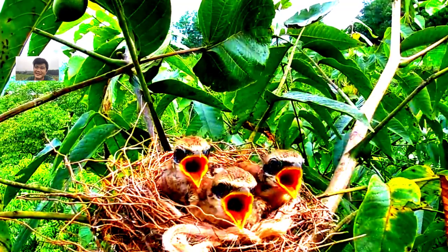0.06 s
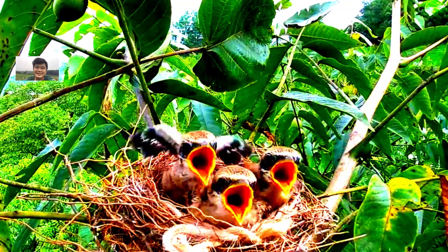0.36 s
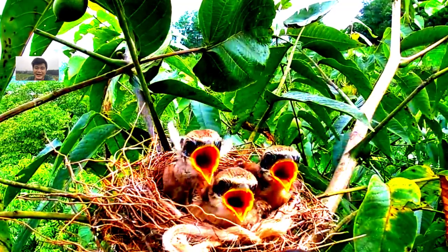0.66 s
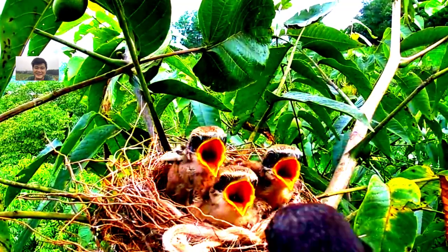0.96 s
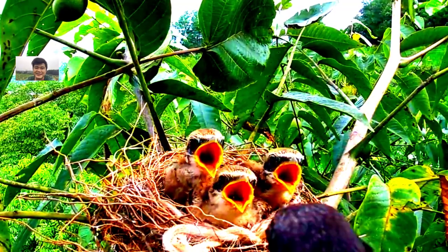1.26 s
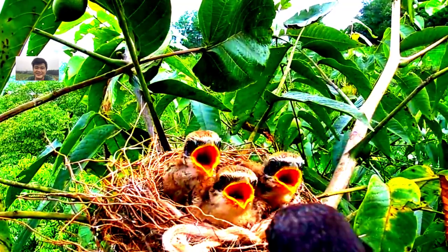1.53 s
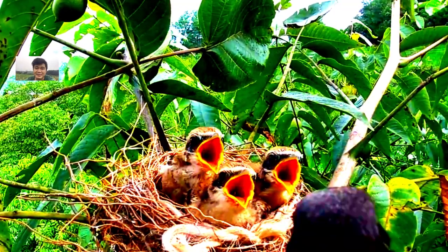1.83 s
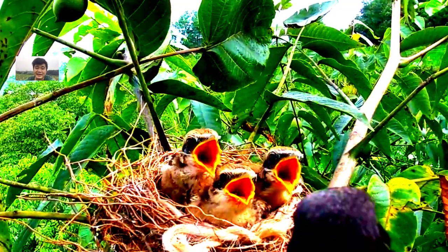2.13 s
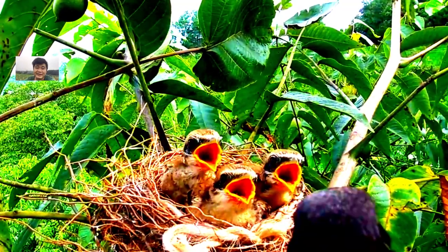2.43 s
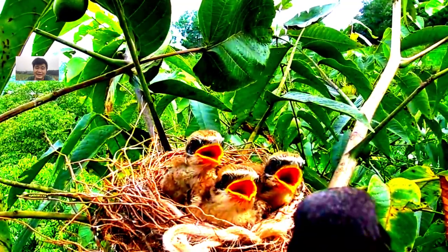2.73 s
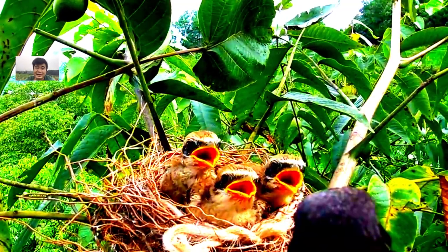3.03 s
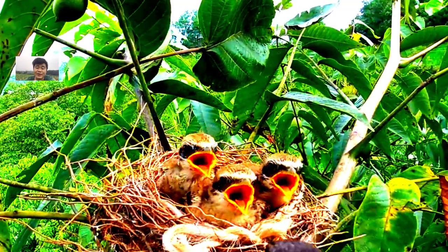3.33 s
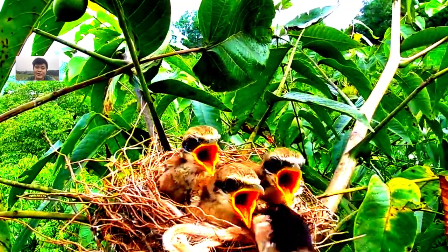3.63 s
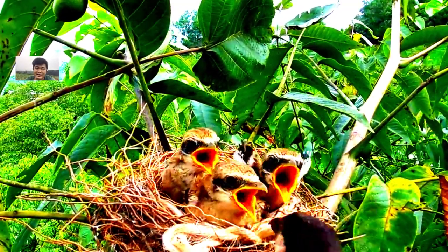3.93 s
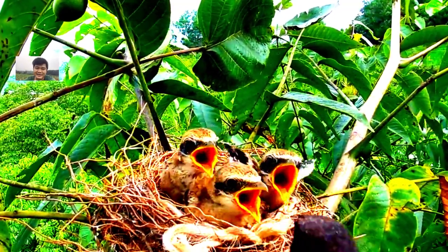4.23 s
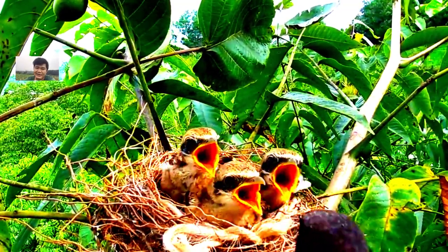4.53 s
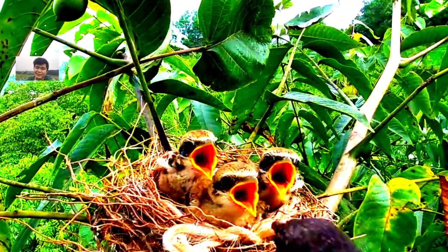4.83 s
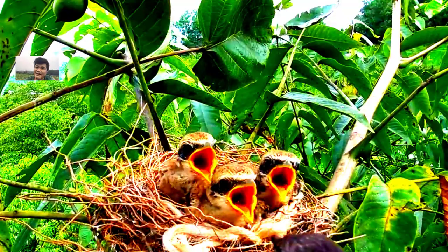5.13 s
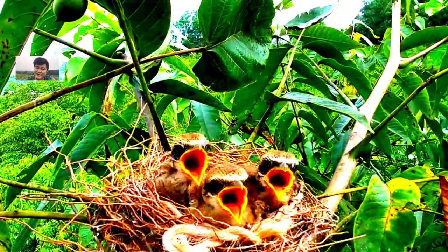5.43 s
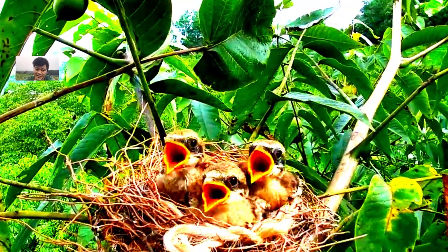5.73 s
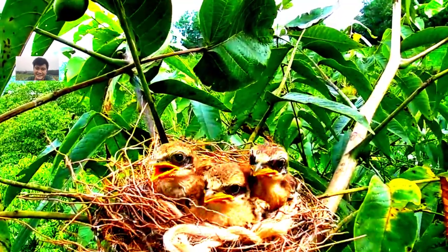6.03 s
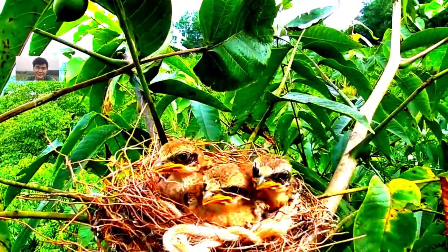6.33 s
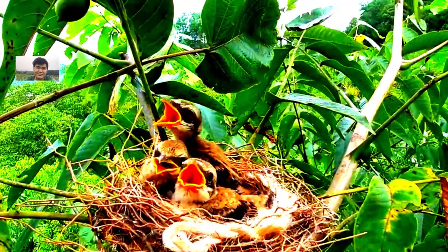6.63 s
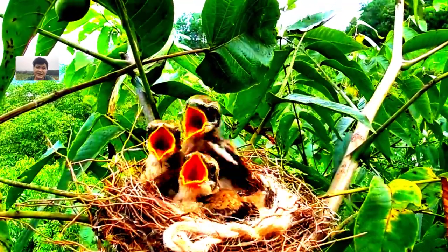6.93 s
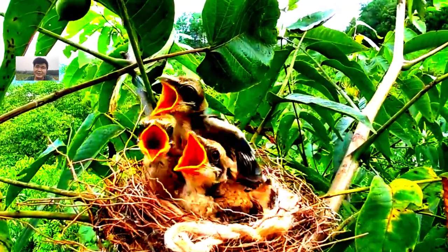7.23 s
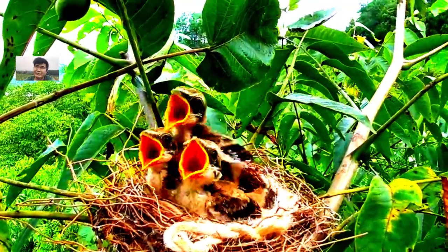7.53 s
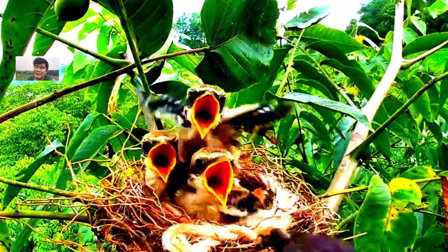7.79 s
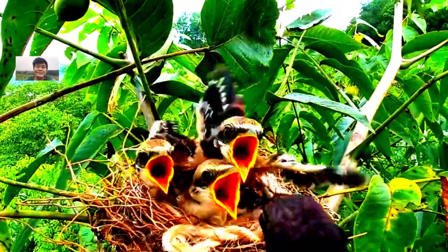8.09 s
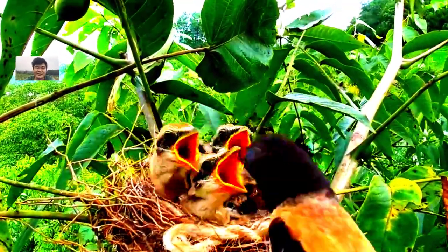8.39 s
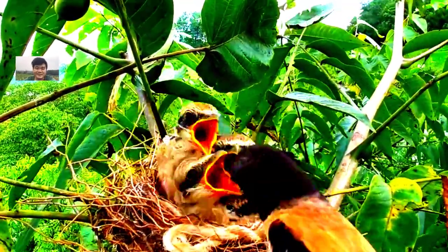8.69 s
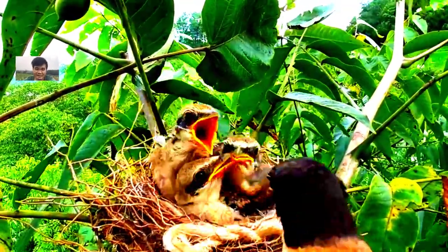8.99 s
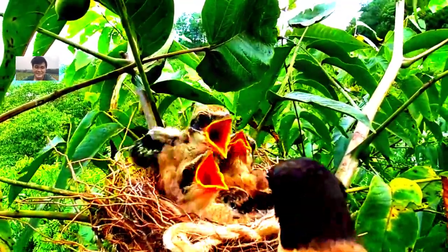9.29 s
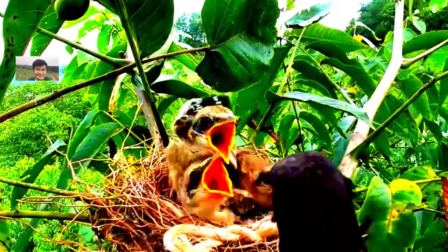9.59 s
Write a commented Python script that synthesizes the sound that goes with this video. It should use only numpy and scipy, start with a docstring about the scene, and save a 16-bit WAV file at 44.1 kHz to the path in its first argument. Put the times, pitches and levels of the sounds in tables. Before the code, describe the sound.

Nestlings chatter in high, harsh cheeps and squawks, with scattered knocks in a twig nest and a soft hiss of leaves.

```python
"""Three nestlings beg in a twig nest, close to a microphone on their branch.
The two sides of each chick's syrinx make gliding cheeps, harsh two-voiced rasps and sudden squawks.
Wings and feet knock the nest, twigs snap, and the shaken branch rumbles in the microphone.
Farther off through the leaves: other birds, insects, a motor and, near the end, a vehicle."""
import sys
import numpy as np
from scipy import signal
from scipy.fft import rfft, irfft, next_fast_len
from scipy.io import wavfile
from scipy.ndimage import map_coordinates

SR = 44100
rng = np.random.default_rng(int(sys.argv[2]) if len(sys.argv) > 2 else 0)


def generate_wav(signal):
    """Clip the signal to [-1, 1] and save it as 16-bit WAV at the path in sys.argv[1]."""
    frames = np.transpose(np.atleast_2d(signal))
    scaled = np.clip(frames, -1, 1) * 32767
    pcm = np.round(scaled).astype(np.int16)
    wavfile.write(sys.argv[1], SR, pcm)


N = 429975

# harsh begging calls: start_s, end_s, level_db, lower_voice_db
RASP_CALLS = [(0, 0.167, -40.5, -41), (0.215, 0.324, -40, -47), (0.319, .57, -39, -51),
              (0.566, 0.816, -42, -42.5), (.82, 0.959, -41.5, -47), (0.939, 1.216, -48, -81),
              (1.23, 1.376, -43, -53), (1.355, 1.475, -44, -64), (1.568, 1.657, -45, -55.5),
              (1.709, 1.828, -47.5, -81), (1.811, 2.047, -41.5, -42), (2.057, 2.23, -46, -85),
              (2.222, 2.36, -41, -43), (2.512, 2.636, -58, -78), (2.9, 3.049, -61, -81),
              (3.424, 3.688, -42, -38), (3.796, 3.933, -39.5, -41), (3.935, 4.084, -41.5, -42.5),
              (4.096, 4.22, -49, -78), (4.335, 4.581, -43, -52), (4.575, 4.667, -43.5, -49),
              (4.762, 4.877, -44, -55), (4.87, 4.973, -42.5, -59), (4.963, 5.138, -43, -46),
              (5.305, 5.463, -42.5, -45.5), (5.553, 5.86, -39.5, -45.5), (5.905, 5.99, -43, -72),
              (7.019, 7.134, -44.5, -67), (7.369, 7.584, -48, -62), (7.719, 8.008, -40, -52),
              (8.05, 8.315, -36.5, -52), (8.3, 8.468, -37.5, -61), (8.463, 8.637, -33.5, -39.5),
              (8.683, 8.871, -36.5, -37.5), (8.943, 9.091, -41.5, -42), (9.15, 9.386, -47, -51),
              (9.449, 9.684, -44, -42.5)]
# spectrum of breath noise through a chick's throat: frequency_hz, gain_db
THROAT_SPECTRUM = [(400, -72.5), (1500, -24.5), (2100, -19), (2600, -6.5), (3500, -9.5), (4600, -15),
                   (5700, 0), (6300, -14.5), (7200, -22.5), (8500, -25.5), (10500, -49), (13000, -55)]
# wings and feet against the nest: time_s, scuff_db, thump_db, shake_db
NEST_KNOCKS = [(2.258, -61, -80, -45.5), (3.465, -30, -39, -45), (3.499, -22, -25, -33),
               (3.529, -43, -35.5, -31), (3.564, -38, -41, -32.5), (3.809, -40.5, -48, -42),
               (4.836, -33.5, -29.5, -30), (5.42, -42.5, -51, -60), (5.626, -31.5, -41.5, -54),
               (5.657, -28.5, -42.5, -48), (5.703, -33, -41.5, -26), (5.772, -25.5, -33, -22.5),
               (5.792, -27.5, -34, -28), (5.847, -50, -45, -38), (5.962, -31.5, -38.5, -20.5),
               (6.427, -47, -44.5, -20), (6.46, -55, -26, -45), (6.609, -45, -53.5, -56),
               (7.596, -30, -39, -42), (7.633, -25.5, -35, -44), (7.653, -28, -40, -41),
               (7.808, -38.5, -61, -64), (7.943, -27.5, -42.5, -37), (7.972, -24, -32, -41),
               (8.011, -31, -26, -40), (8.509, -41, -53, -49), (8.718, -51.5, -55.5, -49),
               (8.877, -44.5, -53.5, -43.5)]
BUZZ_HZ, BUZZ_DRIFT = 560, .13  # pulsing of a rough voice; drift as a share of that rate
WAVER = 0.01064  # unsteadiness of a whistle, as a share of pitch


def amp(db):
    """Decibels to gain."""
    return 10 ** (np.asarray(db) / 20)


def unit(x):
    """Scale to rms 1."""
    return x / np.sqrt(np.mean(x ** 2) + 1e-20)


def noise():
    """White noise as long as the scene."""
    return rng.standard_normal(N)


def along(points, hz):
    """Read (frequency_hz, value) points on a log frequency axis."""
    freqs, values = np.transpose(points)
    return np.interp(np.log(np.abs(hz) + 1), np.log(freqs + 1), values)


def curves(rows):
    """One value per sample for each column after the time."""
    times, *columns = np.transpose(rows)
    return [np.interp(np.arange(N) / SR, times, column) for column in columns]


def wobble(rate, n):
    """A smooth random curve of n samples, rate knots a second."""
    knots = rng.standard_normal(max(int(n * rate / SR) + 4, 512))
    return map_coordinates(knots, [2 + np.arange(n) * rate / SR], mode="wrap")


def filtered(x, response):
    """Filter x by a complex response of frequency."""
    size = next_fast_len(len(x) + SR // 4)
    return irfft(rfft(x, size) * response(np.fft.rfftfreq(size, 1 / SR)), size)[:len(x)]


def coloured(x, spectrum):
    """Shape x by (frequency_hz, gain_db) points, at rms 1."""
    return unit(filtered(x, lambda hz: amp(along(spectrum, hz))))


def ringing(x, modes):
    """Pass x through resonances (centre_hz, width_hz, gain_db), keeping the power of white noise."""
    def response(hz):
        body = sum((-1) ** k * amp(db) * 1j * hz * width / (centre ** 2 - hz ** 2 + 1j * hz * width)
                   for k, (centre, width, db) in enumerate(modes))
        return body / np.sqrt(np.mean(np.abs(body) ** 2))
    return filtered(x, response)


def add(track, start_s, sound):
    """Mix a sound in at start_s."""
    part = track[max(round(start_s * SR), 0):][:len(sound)]
    part += sound[:len(part)]


def span(start, end, attack_s, release_s):
    """Time, progress 0-1 and a soft-edged gate for one call."""
    t = np.arange(max(int((end - start) * SR), 200)) / SR
    ramps = np.minimum(t / attack_s, 1) * np.minimum((t[-1] - t) / release_s, 1)
    return t, t / t[-1], np.sin(np.pi / 2 * ramps)


def puffs(events, attack_s, t60_s):
    """An envelope that jumps and dies at each (time_s, level_db)."""
    power, t = np.zeros(N), np.arange(SR // 3) / SR
    for start, db in events:
        add(power, start, (amp(db - 60 * t / t60_s) * (1 - np.exp(-t / attack_s))) ** 2)
    return np.sqrt(power)


def phase(hz):
    """Running phase of a pitch curve."""
    return 2 * np.pi * np.cumsum(hz) / SR


def whistle(hz, flutter=0):
    """One side of the syrinx: a sine whose overtone passes the throat only when low."""
    # second harmonic against the fundamental: frequency_hz, gain_db
    overtone = [(4400, 1), (5900, -2.5), (7200, -25), (8600, -31), (10000, -46.5), (12000, -65)]
    angle = phase(hz) + flutter
    return np.sqrt(2) * (np.sin(angle) + amp(along(overtone, 2 * hz)) * np.sin(2 * angle))


def rasps(low_hz=2680, upper_hz=4380, upper_db=6.5, octave_db=2, hiss_db=-4, coupling=.45, jitter=.0055):
    """Both sides of the syrinx pushed hard: two coupled tones and a chaotic, pulsed hiss."""
    def swell(n):
        return amp(3.2 * wobble(28, n) - 2.5)

    voices, hiss_level = np.zeros(N), np.zeros(N)
    for start, end, db, lower_db in RASP_CALLS:
        t, progress, gate = span(start, end, attack_s=.01, release_s=.02)
        n = len(t)
        # the two voices start close in pitch, spread apart and close again
        closeness = np.minimum(np.exp(-t / .012) + np.exp((t - t[-1]) / .013), 1)
        low_drift = .035 * rng.normal() + .03 * wobble(25, n) + jitter * wobble(300, n)
        low_phase = phase(low_hz * (1 + low_drift + .27 * closeness))
        upper_drift = .04 * (1 - 2 * progress) + .045 * wobble(30, n) + jitter * wobble(500, n)
        upper_pitch = upper_hz * (1 + upper_drift - .16 * closeness)
        buzz = np.sin(phase(BUZZ_HZ * (1 + BUZZ_DRIFT * wobble(25.08, n) + .04 * wobble(400, n))))
        flutter, pulse = coupling * buzz, 1 + buzz
        upper = amp(db + upper_db) * swell(n) * whistle(upper_pitch, flutter) * (.33 + .22 * pulse)
        lower = amp(lower_db) * swell(n) * np.sin(low_phase + flutter / 2)
        lower *= np.clip(.9 + wobble(24, n), 0, 1)  # the lower voice comes and goes
        octave = amp(db + octave_db) * swell(n) * (1 - closeness) * np.sin(2 * low_phase + flutter)
        add(voices, start, gate * (upper + np.sqrt(2) * (lower + octave)))
        add(hiss_level, start, gate * amp(db + hiss_db + 3 * wobble(54, n)) * unit(.41 + pulse ** 2))
    return voices + np.sqrt(np.mean(hiss_level ** 2)) * coloured(hiss_level * noise(), THROAT_SPECTRUM)


def squeaks(pitch_hz=4100, per_second=20, gain_db=4, typical_s=.021, slide=.241, bend=.17):
    """While a chick rasps, its voice keeps breaking into short random slides."""
    out = np.zeros(N)
    for rasp_start, rasp_end, db, _ in RASP_CALLS:
        count = round((rasp_end - rasp_start) * per_second)
        starts = rng.uniform(rasp_start, rasp_end, count)
        for start, (size, height, slope, curl) in zip(starts, rng.standard_normal((count, 4))):
            end = min(start + typical_s * np.exp(size / 2), rasp_end)
            t, progress, gate = span(start, end, attack_s=.004, release_s=.01)
            centred = progress - .5
            contour = .2 * np.tanh(height) + slide * slope * centred + bend * curl * centred ** 2
            hz = pitch_hz * np.exp(contour) * (1 + WAVER * wobble(150, len(t)))
            add(out, start, amp(db + gain_db) * gate * whistle(hz))
    return out


def branch_sway(rock_db=-7, jolt_db=1):
    """The branch rocks slowly and every knock or wingbeat jolts it; it rumbles in the microphone."""
    # slow rocking of the branch: time_s, level_db
    rocking = [(0.0, -69), (0.65, -58), (0.95, -68), (3.2, -55), (3.69, -41), (4.53, -58.5), (4.91, -45.5),
               (5.65, -50.5), (5.89, -32), (6.35, -54), (6.87, -50.5), (9.75, -54)]
    # rumble at the microphone: frequency_hz, gain_db
    rumble = [(10, -7), (28, 6), (60, -6), (100, -20.5), (170, -11.5), (400, -59.5), (900, -120)]
    shakes = [(start, db) for start, _, _, db in NEST_KNOCKS] + wingbeats()
    jolts = amp(jolt_db) * puffs(shakes, attack_s=.002, t60_s=.27)
    return np.hypot(amp(curves(rocking)[0] + rock_db), jolts) * coloured(noise(), rumble)


def leaf_air(level_db=-53):
    """Air in the leaves all round the nest: a soft, nearly even hiss."""
    # wash of leaves and insects: frequency_hz, gain_db
    spectrum = [(40, -25), (100, -46.5), (200, -3.5), (300, -14.5), (580, -16), (800, -7.5), (1050, -15.5),
                (2500, -16.5), (3000, -8.5), (3900, -2), (4700, -7.5), (6800, -17.5), (8800, -25.5),
                (13000, -57)]
    return amp(level_db + .5 * wobble(5, N)) * coloured(noise(), spectrum)


def insects(level_db=-57, swell_db=2.5):
    """A thin insect drone: a narrow band of noise that swells and sinks."""
    band = [(2400, -50.5), (3050, -23), (3300, -10), (3600, -24.5), (4800, -47.5)]
    return amp(level_db + swell_db * wobble(10, N)) * coloured(noise(), band)


def traffic_hum(level_db=-69):
    """Distant traffic, heard as a low, slowly wandering hum."""
    return amp(level_db + 2.3 * wobble(1, N)) * ringing(noise(), [(165.5, 39, 14), (880, 82, -19)])


def leaf_echo(x, t60_s):
    """The foliage scatters a call into a diffuse echo."""
    t = np.arange(SR // 2) / SR
    tail = rng.standard_normal(len(t)) * amp(-60 * t / t60_s) * (t > .003)
    return signal.fftconvolve(x, tail / np.linalg.norm(tail))[:N]


def glide(progress, first_hz, last_hz, steady_share=.47, arch=.01826):
    """Pitch through a cheep: a shallow arch whose slide gathers speed."""
    slide = steady_share * progress + (1 - steady_share) * progress ** 3
    return (first_hz + (last_hz - first_hz) * slide) * (1 + arch * np.sin(np.pi * progress))


def cheeps(beat_hz=240, twin_gain=.55, side_tones=.11, step_hz=36, step_depth=.11, shimmer_db=2.5):
    """Gliding whistles; in rough ones the pitch flutters and the two sides of the syrinx beat."""
    # cheeps and quick flicks: start_s, end_s, first_hz, last_hz, level_db, roughness (0-1)
    calls = [(0.005, 0.142, 4480, 4120, -44, 0.08), (0.145, 0.193, 3990, 3060, -35, 0.2),
             (0.248, 0.342, 4500, 3380.0, -35.5, 0.34), (0.315, 0.404, 4410, 4320, -40.5, 0),
             (0.479, 0.562, 4710, 5260, -28.5, 0.23), (0.564, 0.73, 5370, 5400, -33, 0.88),
             (0.683, 0.725, 4630, 4380, -25.0, 0.5), (0.815, 0.93, 5380, 4980, -35, 0.65),
             (0.945, 0.958, 2700, 3700, -37, 0.15), (0.948, 1.072, 4810, 4220.0, -29, 0.66),
             (1.05, 1.237, 3870, 3670, -37.5, 0.25), (1.058, 1.14, 5060, 4460, -26, 0.5),
             (1.233, 1.293, 5440.0, 5370, -36, 0.04), (1.38, 1.45, 4540.0, 4080.0, -34.5, 0.5),
             (1.385, 1.555, 4220, 2816, -37.5, 0.1), (1.564, 1.601, 5100, 4600, -35.5, 0.54),
             (1.66, 1.727, 4130, 3470.0, -37, 0.37), (1.809, 1.861, 5520.0, 5350, -31.5, 0.4),
             (1.934, 2.053, 4890, 4810, -26, 0.05), (2.048, 2.158, 4550, 4500, -29.5, 0.75),
             (2.11, 2.127, 4610, 3930, -31, 0.2), (2.153, 2.234, 4420, 4500, -37, 0.15),
             (2.3, 2.393, 4160.0, 2740, -36, 0.1), (2.373, 2.412, 4190, 4250, -33.0, 0.54),
             (2.508, 2.677, 4173, 2870, -32.5, 0.41), (2.532, 2.594, 4076, 3800, -34.5, 0.83),
             (2.854, 2.966, 4370, 4070, -37, 0.54), (2.965, 3.021, 4900, 3540, -38.5, 0.9),
             (2.962, 3.11, 3834, 2850, -35, 0.27), (3.387, 3.516, 4360, 4490, -35, 0.08),
             (3.574, 3.682, 4430, 5100, -34.5, 0.54), (3.665, 3.714, 4380, 2680, -40, 0),
             (4.03, 4.112, 5560, 5100, -34.5, 0.54), (4.094, 4.193, 5930, 4560, -26.5, 0.25),
             (4.179, 4.325, 4120, 4450, -35.5, 0.25), (4.3, 4.368, 4500, 3400, -39, 0.4),
             (4.331, 4.424, 5600, 5920, -29.0, 0.03), (4.428, 4.605, 5400.0, 4810, -32.5, 0.37),
             (4.6, 4.623, 3900, 3170, -34.5, 0), (4.676, 4.755, 4750.0, 4180.0, -30, 0.7),
             (4.749, 4.861, 5860, 4860, -31.5, 0.54), (4.868, 4.97, 4940, 4870, -31, 0.64),
             (4.948, 4.992, 3750, 2720, -35.0, 0), (5.088, 5.276, 5530, 4360, -29.5, 0.25),
             (5.153, 5.2, 4510, 4230, -31.5, 0.3), (5.262, 5.28, 4100, 2770, -32.5, 0.22),
             (5.416, 5.461, 5540, 5300, -32.5, 0.54), (5.475, 5.623, 5170.0, 4350, -31, 0.02),
             (5.703, 5.79, 4900, 4460, -29.5, 0.8), (5.733, 5.874, 5810, 4140, -31.5, 0.53),
             (5.913, 6.036, 4104, 2770, -38, 0.25), (7.076, 7.151, 5920, 5730.0, -39.5, 0.54),
             (7.124, 7.259, 5040, 3980, -33.5, 0.25), (7.354, 7.375, 4650, 4320, -29.5, 0),
             (7.47, 7.552, 3485, 3130, -39.0, 0.54), (7.531, 7.597, 4210, 4030, -35.0, 0.5),
             (7.678, 7.696, 4420, 4960, -38.5, 0.25), (7.711, 7.838, 4990, 4770, -37, 0.4),
             (7.814, 7.97, 6280, 5240, -37.5, 0.24), (7.87, 7.976, 4400, 4090, -31, 0.14),
             (7.968, 8, 5120, 4900, -26, 0.3), (8.046, 8.199, 5520, 4610, -33, 0.64),
             (8.06, 8.093, 5700, 3600, -25.5, 0.3), (8.1, 8.33, 6410, 6100, -46, 0.4),
             (8.334, 8.425, 5850, 4330.0, -26.5, 0.45), (8.501, 8.648, 5110, 4790, -30, 0.6),
             (8.605, 8.617, 2340, 3340, -31, 0.1), (8.687, 8.72, 5150, 5040, -23.5, 0.3),
             (8.722, 8.799, 5690, 3850.0, -27.5, 0.5), (8.752, 8.828, 3930, 3746, -22.5, 0.8),
             (8.8, 8.84, 4190, 2390, -28.5, 0.43), (8.927, 9.025, 4890, 4880, -30, 0.77),
             (8.957, 8.974, 3110, 4030, -31.5, 0), (9.011, 9.024, 4160, 2300, -28.5, 0.12),
             (9.166, 9.378, 4720, 5080, -30.5, 0.6), (9.381, 9.401, 3650, 2070.0, -35.5, 0.25),
             (9.458, 9.664, 4980.0, 4830, -29, 0.42)]
    out = np.zeros(N)
    for start, end, first_hz, last_hz, db, roughness in calls:
        t, progress, gate = span(start, end, attack_s=.0014, release_s=.14 * (end - start))
        n = len(t)
        rough = roughness * amp(3 * wobble(30, n))
        # the pitch hooks up at the start and drops away as the breath ends
        edges = .07 * np.exp(-t / .0019) + .047 * np.exp((t - t[-1]) / .006)
        flutter = WAVER * wobble(75, n) + .011 * rough * wobble(330, n)
        # a rough cheep that falls does so in quick steps
        sawtooth = .5 - phase(step_hz * np.exp(.3 * wobble(20, n))) / (2 * np.pi) % 1
        falling = np.clip(10 * (1 - last_hz / first_hz), .2, 1)
        steps = step_depth * roughness * falling * sawtooth
        hz = glide(progress, first_hz, last_hz) * (1 - edges + flutter + steps)
        buzz_phase = phase(BUZZ_HZ * (1 + BUZZ_DRIFT * wobble(35, n)))
        main = whistle(hz, side_tones * rough * np.sin(buzz_phase + 1))
        main *= 1 + 2 * side_tones * rough * np.sin(buzz_phase)
        twin = twin_gain * rough * whistle(hz - beat_hz * np.exp(.5 * wobble(19, n)))
        gate *= np.clip((hz - 1300) / 1300, 0, 1)  # the voice gives out at the bottom of its range
        swell_db = .5 * (np.sin(np.pi * progress) - 1) + shimmer_db * wobble(92.4, n)
        add(out, start, gate * amp(db + swell_db) * unit(main + twin))
    return out


def far_birds():
    """Short rising whistles from other trees."""
    # distant calls: start_s, end_s, first_hz, last_hz, level_db
    calls = [(0.399, 0.502, 1763, 2400, -49.5), (3.036, 3.083, 1880, 1950, -50),
             (3.159, 3.224, 1794, 2230, -50.5), (6.171, 6.24, 4940, 5020, -47.5),
             (6.391, 6.432, 1330, 2290, -46.5), (6.462, 6.51, 2700, 3370, -43),
             (6.577, 6.744, 3770, 4570, -49.5), (6.62, 6.663, 2730, 3270, -41.5),
             (6.766, 6.829, 2880, 3240, -43), (6.84, 6.994, 3880, 4405, -44)]
    out = np.zeros(N)
    for start, end, first_hz, last_hz, db in calls:
        t, progress, gate = span(start, end, attack_s=.0018, release_s=.014)
        hz = (first_hz + (last_hz - first_hz) * progress) * (1 + .013 * wobble(150, len(t)))
        add(out, start, amp(db) * gate * np.sin(phase(hz)))
    return out


def squawks(length_s=.036, tone_db=-9, breath_db=-24, hook=.22, shiver=.03):
    """As a beak snaps open, the first push of air flicks the pitch up and throws it about."""
    # sudden squawks: start_s, level_db, pitch_hz
    calls = [(0.4199, -12.5, 5410), (0.8142, -14.5, 5660), (1.231, -15, 5530), (1.8153, -19.5, 4450),
             (2.2263, -19, 5020), (3.4208, -20, 4450), (3.787, -23, 4526), (4.2994, -18, 4580),
             (4.4852, -17, 5260), (4.7128, -21, 4240), (4.8733, -18.5, 4970), (5.0924, -21.5, 4290),
             (5.294, -20.5, 4440), (5.3931, -20, 4540), (5.5448, -14.5, 5075), (5.9069, -20, 4090),
             (7.721, -23, 4870), (8.0541, -17, 5900), (8.3903, -14, 4960), (8.6901, -21, 5040),
             (8.9354, -10, 4980), (9.1662, -11.5, 4870), (9.4507, -13.5, 5066), (9.7413, -11, 5650)]
    tones = np.zeros(N)
    for start, db, pitch_hz in calls:
        t, _, gate = span(start, start + length_s, attack_s=.0011, release_s=length_s)
        hz = pitch_hz * (1 - hook * np.exp(-t / .0022) + shiver * wobble(900, len(t)))
        flicker = amp(2.7 * wobble(290, len(t)))
        add(tones, start, amp(db + tone_db) * gate * unit(whistle(hz) * flicker))
    breath = puffs([(start, db) for start, db, _ in calls], attack_s=.001, t60_s=.12)
    return tones + amp(breath_db) * breath * coloured(noise(), THROAT_SPECTRUM)


def nest_knocks(scuff_db=-2, push_db=31, rub_db=-4, flap_db=-5, cutoff_hz=3000):
    """Wings and feet scuff the nest and ring it; each blow pushes and rubs the branch under it."""
    # resonances of the twig nest: centre_hz, width_hz, gain_db
    nest_modes = [(605.3, 32, 20.5), (853.5, 35.5, 14.5), (1117, 70, -3.5), (1770, 102, 1)]
    # resonances of the branch: centre_hz, width_hz, gain_db
    branch_modes = [(91, 9.6, -9.5), (139.7, 13.5, -2), (225.4, 16.4, 3)]
    blows = [(start, db) for start, _, db, _ in NEST_KNOCKS]
    blows += [(start, db + flap_db) for start, db in wingbeats()]
    force = amp(rub_db) * puffs(blows, attack_s=.0024, t60_s=.13) * noise()
    for start, db in blows:
        add(force, start, amp([db + push_db]))  # the push is a single impulse
    scuff_level = puffs([(start, db) for start, db, _, _ in NEST_KNOCKS], attack_s=.002, t60_s=.16)
    scuffs = amp(scuff_db) * ringing(scuff_level * noise(), nest_modes)
    return filtered(scuffs + ringing(force, branch_modes), lambda hz: 1 / (1 + 1j * hz / cutoff_hz))


def far_motor():
    """A distant motor: one thin, wavering whine that swells and fades."""
    # course of the whine: time_s, pitch_hz, level_db
    whine = [(0, 1111, -93.5), (3.2, 1188, -80.5), (4.8, 1113, -66.5), (5.6, 1078, -67.5), (6.2, 1060, -80)]
    hz, db = curves(whine)
    return amp(db + 2.9 * wobble(28, N)) * np.sin(phase(hz * (1 + .0026 * wobble(60, N))))


def twig_snaps(gain_db=1):
    """Dry twigs snap in short, bright bursts of noise."""
    # snaps: time_s, level_db
    snaps = [(5.789, -35.5), (5.849, -29), (5.966, -39), (6.427, -42), (6.464, -38)]
    crack = coloured(noise(), [(300, 7.5), (1800, 12), (5000, 8), (9000, 1), (13000, -25)])
    return amp(gain_db) * puffs(snaps, attack_s=.0005, t60_s=.07) * crack


def wingbeats(start_s=6.03, period_s=.06, first_db=-32, fade_db=3, count=5):
    """One chick beats its wings and settles: (time_s, level_db) of each weakening beat."""
    return [(start_s + k * period_s, first_db - k * fade_db) for k in range(count)]


def vehicle():
    """A vehicle draws near: dull road noise that rises at the end."""
    # its approach: time_s, level_db
    approach = [(0, -106.5), (9.1, -61.5), (9.3, -61), (9.5, -52), (9.75, -59)]
    spectrum = [(100, -52), (280, -5), (390, -4.5), (520, -6.5), (900, -9.5), (2000, -21), (6000, -98)]
    return amp(curves(approach)[0]) * coloured(noise(), spectrum)


def scene():
    """From the branch, the brood is close and dry; the other birds are mostly echo."""
    brood = cheeps() + rasps() + squeaks() + squawks()
    neighbours = far_birds()
    echo = amp(-20) * leaf_echo(brood, t60_s=.2) + amp(1) * leaf_echo(neighbours, t60_s=.4)
    movement = nest_knocks() + twig_snaps() + branch_sway()
    surroundings = leaf_air() + insects() + traffic_hum() + far_motor() + vehicle()
    return (brood + .5 * neighbours + echo + movement + surroundings)[None]


def record(dry, top_hz=13200):
    """One camera microphone beside the nest; the camera keeps nothing above its band limit."""
    return filtered(dry[0], lambda hz: hz < top_hz)[None]


dry = scene()
out = record(dry)
generate_wav(out)
```